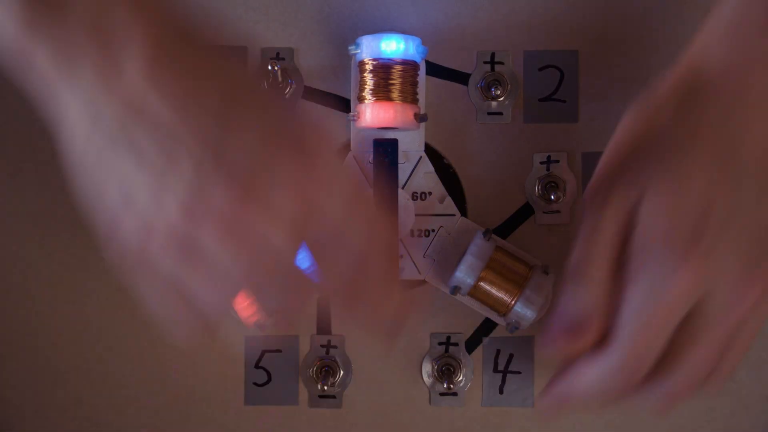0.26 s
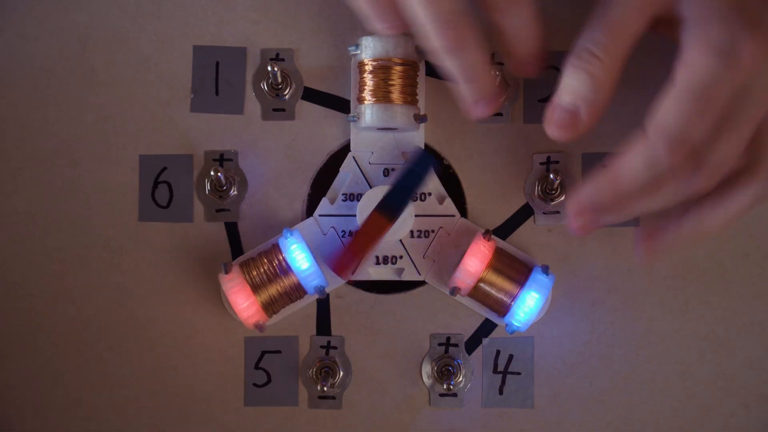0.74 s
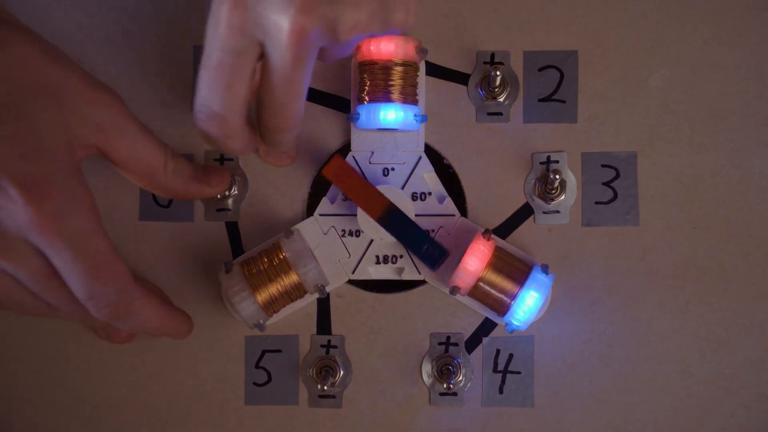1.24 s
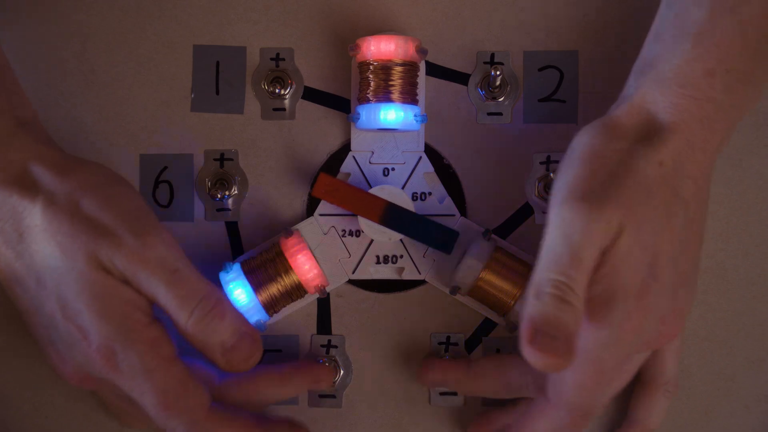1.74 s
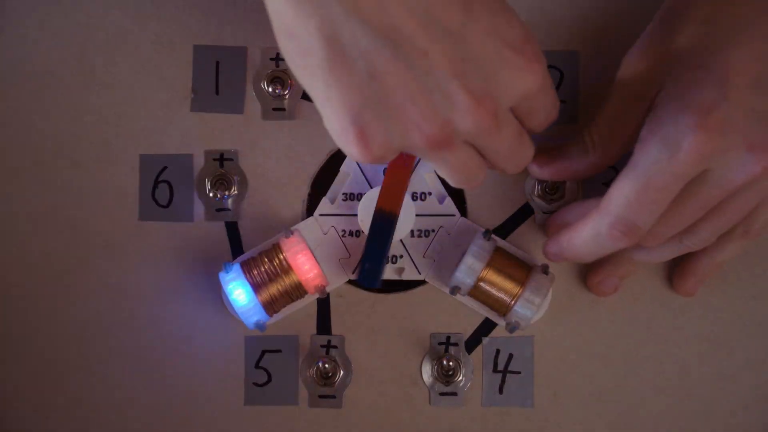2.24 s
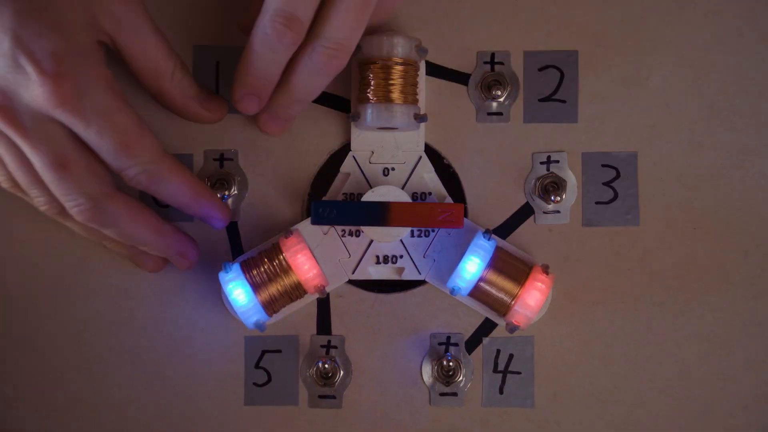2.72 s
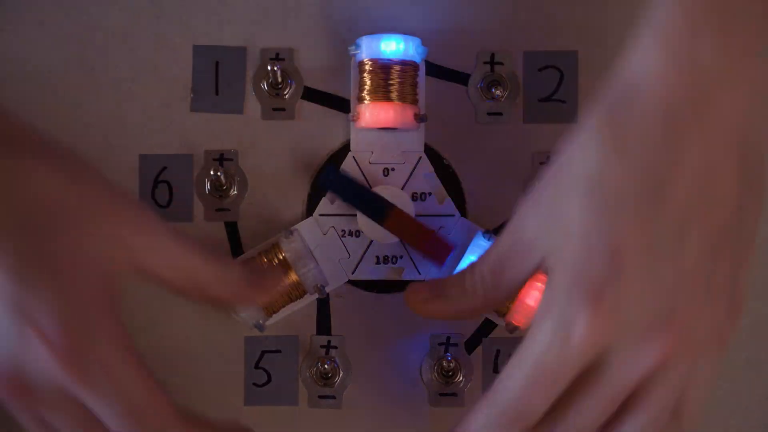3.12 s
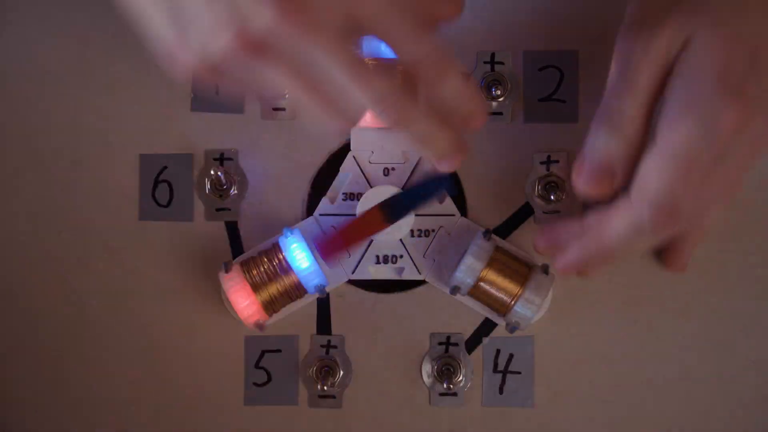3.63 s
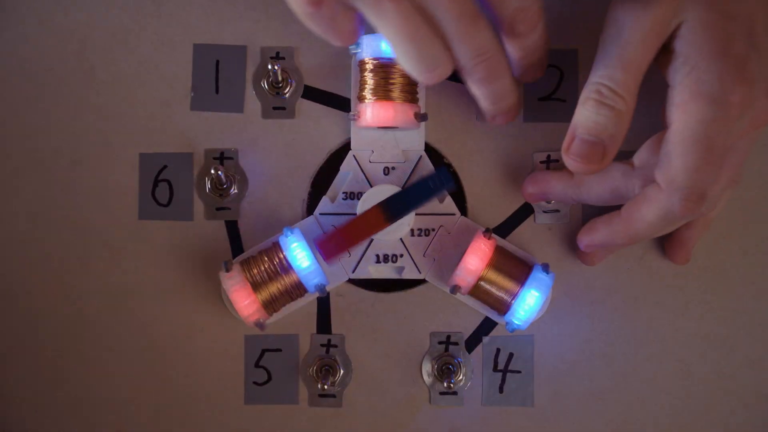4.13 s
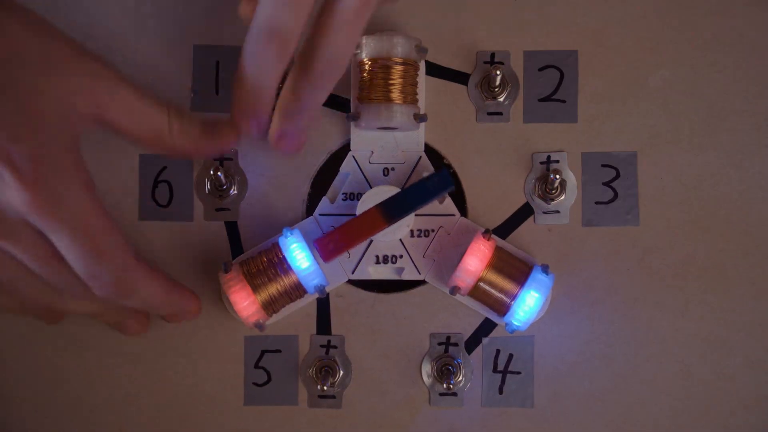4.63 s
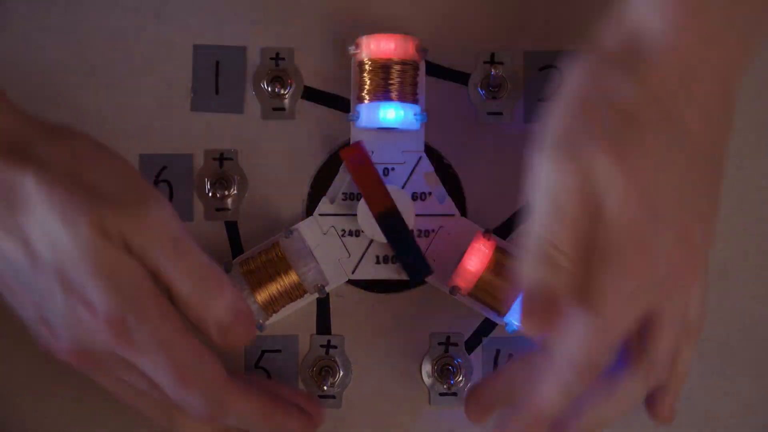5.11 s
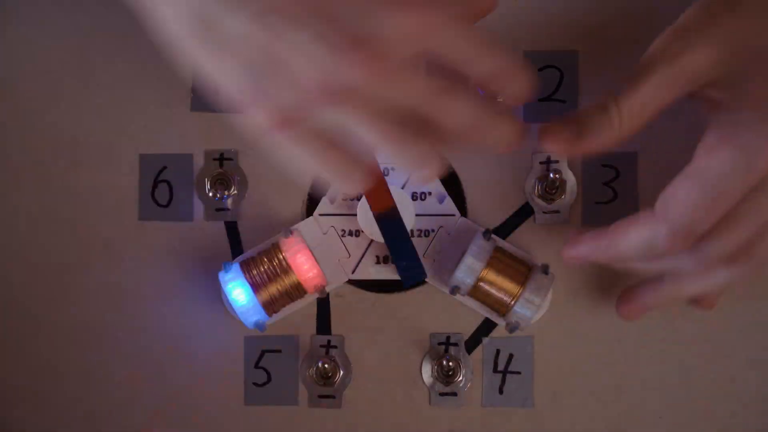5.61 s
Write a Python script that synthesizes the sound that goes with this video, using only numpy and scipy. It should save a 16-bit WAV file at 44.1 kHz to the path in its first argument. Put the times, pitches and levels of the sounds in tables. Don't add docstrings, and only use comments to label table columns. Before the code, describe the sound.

Close, dry metallic clacks come in eleven quick groups over six seconds, mostly doubles and triples, with occasional single snaps. The levers ring briefly, contacts chatter, and the board beneath gives a hollow tick. Soft finger movement, tiny taps and low table thumps from leaning arms fill the gaps. A small, lightly reverberant room hums quietly; a distant bird chirps faintly in the second half.

```python
import sys
import numpy as np
from scipy import signal
from scipy.fft import rfft, irfft
from scipy.io import wavfile
from scipy.ndimage import uniform_filter1d

SR = 44100
rng = np.random.default_rng(int(sys.argv[2]) if len(sys.argv) > 2 else 0)


def digitize_waveform(pressure):
    field = np.atleast_2d(pressure).T
    bounded = np.clip(field, -1, 1)
    quanta = np.round(bounded * 32767).astype(np.int16)
    wavfile.write(sys.argv[1], SR, quanta)


def undo_db(level):
    steps = np.asarray(level, float) / 20
    return 10 ** steps


N = 258426

# f/Hz, level/dB
SKIN_SPECTRUM = [(300, -9.5), (1000, 2.5), (3000, 4), (6000, 2), (10000, -4.5), (15000, -12)]


def read(points, hz):
    f, value = np.transpose(points)
    return np.interp(np.log(hz + 1), np.log(f + 1), value)


def peaked(x):
    return x / (abs(x).max() + 1e-12)


def evened(x):
    return x / np.sqrt(np.mean(x ** 2) + 1e-20)


def coloured(x, points):
    gain = undo_db(read(points, np.fft.rfftfreq(len(x), 1 / SR)))
    return irfft(rfft(x) * gain, len(x))


def add(mix, s, sound):
    part = mix[max(round(s * SR), 0):][:len(sound)]
    part += sound[:len(part)]


def swells(rows, rest_db):
    t = np.arange(N) / SR
    bells = [undo_db(db) * np.exp(-(2 * (t - s) / length_s) ** 2) for s, db, length_s in rows]
    return undo_db(rest_db) + sum(bells)


def flicks():
    # t/s, peak level/dB, metal f/Hz, board level/dB re peak, thud level/dB re peak
    leads = [(0.1700, -9.5, 5650, -22, -8), (0.7299, -0.5, 6220, -12.5, -16.5),
             (1.3259, -0.5, 6260, -16.5, -20.5), (1.8464, -5, 6220, -11, -17.5),
             (2.4019, -0.5, 7400, -17.5, -21.5), (2.9367, -2.5, 7480, -9.5, -37.5),
             (3.445, -6.5, 5440, -19, -12.5), (3.9433, -4, 5710, -7, -18.5),
             (4.33, -0.5, 5930, -11.5, -24.5), (4.9294, 1, 7790, -13, -19.5),
             (5.4374, -3.5, 5760, -15, -34)]
    followers = [(0.181, -1.5, 6780, -20, -19), (0.2069, -4.5, 7370, -10.5, -16.5),
                 (0.7467, -2.5, 5600, -13.5, -30.5), (1.3435, -3.5, 4640, -12.5, -31.5),
                 (1.8558, -7, 5530, -9.5, -29), (1.8787, 4, 5560, -10, -33.5), (2.43, -1.5, 5920, -21, -20),
                 (2.941, -1.5, 5170, -15, -17), (2.9482, -13.5, 6470, -9.5, -11.5),
                 (3.4552, -1, 6630, -28, -18), (3.4693, -6, 6520, -10, -18.5), (3.9465, -9, 5940, -22, -18),
                 (4.9466, -4.5, 4884, -22.5, -26), (5.4426, -4, 5130, -15, -15.5),
                 (5.465, 3, 5160, -10.5, -24)]
    flick_sides = [0, 1, 2, 0, 1, 2, 0, 1, 1, 2, 0]
    near, sent = np.zeros((2, N))
    levers = [(*row, -14.5) for row in leads] + [(*row, -17.5) for row in followers]
    lead_s = np.transpose(leads)[0]
    for s, *row in sorted(levers):
        flick = np.searchsorted(lead_s, s, "right") - 1
        direct, spread = snap(*row, flick_sides[flick])
        add(near, s - 0.02, direct)
        add(sent, s - 0.02, spread)
    return near, sent


def snap(db, metal_hz, board_db, thud_db, edge_db, side):
    # f ratio, level/dB, t60/s
    metal_modes = [(.5, -12.5, .004), (.66, -1, 0.0064), (.82, -2.5, .005), (1.0, 7, .008),
                   (1.16, -1.5, .005), (1.4, -5.5, 0.0049), (1.7, -11, 0.0024), (2.1, -14.5, .003)]
    # f/Hz, level/dB, t60/s
    board_modes = [(930, -9, 0.017), (1100, -10, 0.041), (1370, -5, 0.091), (1605, 4, 0.061),
                   (1710, 6, 0.027), (2170, -1, 0.036), (2700, -10.5, 0.0027), (3280, -13.5, 0.034)]
    # f/Hz, t60/s, level/dB driven from near edge, right edge, left edge
    panel_modes = [(221, 0.056, -6, -8, -14.5), (316, 0.036, -5.5, -13.5, -17.5),
                   (397, .07, -2, -11.5, -16.5), (425.3, 0.11, -13.5, -1, -7.5), (620, .08, 2.5, -5, 4.5),
                   (712, 0.097, -2, -1.5, 0.5), (907, .07, -7.5, 3, -9.5), (1023, 0.086, -13, 3.5, -9)]
    # f/Hz, level/dB
    crack_spectrum = [(180, -44), (500, -20), (1500, 1.5), (3000, -2.5), (6000, -3), (9000, -3),
                      (12000, -11.5), (15000, -38)]
    # f/Hz, level/dB
    spread_spectrum = [(120, -32.5), (250, -13), (600, -4.5), (1500, -2), (2700, -3), (5500, -5),
                       (8000, -8.5), (11000, -16), (15000, -29.5), (15600, -50.5)]
    side_edge_db = [-1, 1.5, -0.5]

    t, lead_s = np.arange(4096) / SR, 0.02
    edge_db = edge_db + side_edge_db[side]
    luck = rng.standard_normal((2, 8))
    chance = rng.random(4096)
    noise = rng.standard_normal((2, 4096))

    after = t - lead_s
    rattle_ms = 1.63 + 0.027 * max(db, 0)
    u = np.maximum(after, 0) * 1000 / rattle_ms
    release = 0.13 * np.exp(-abs(after) / 0.0015) * (after > -0.0022)
    rattle = u ** 0.84 * np.exp(1 - u)
    settling = 0.25 * (after > 0) * np.exp(-after / 0.016)
    chatter = release + rattle + settling
    blows = chatter * noise[0] * (chance < 0.25)

    def heard(response):
        return peaked(signal.fftconvolve(blows, response)[:4096])

    edge = [(250, -22), (650, -1.0), (6000, 0.0034), (10000, 0.72 * (edge_db + 14))]
    crack = coloured(peaked(coloured(chatter * noise[1], crack_spectrum)), edge)
    metal = heard(coloured(ring(metal_modes, t, luck, scale_hz=metal_hz), edge))
    board = heard(ring(board_modes, t, luck[:, ::-1]))
    driven = [(hz, sides[side], t60) for hz, t60, *sides in panel_modes]
    thud = heard(ring(driven, t, -0.2 * luck) * (1 - np.exp(-t / 0.004)))
    direct = peaked(metal + 1.1 * crack)
    direct = direct + undo_db(board_db + 2.5) * board + undo_db(thud_db + 1.5) * thud

    pulse = coloured(np.arange(4096) == round(lead_s * SR), spread_spectrum)
    tilt = [(500, 0.3 * (thud_db + 25.0)), (1600, 0.82 * (board_db + 15.5)), (4000, 0.0052),
            (6000, 0.0021), (10000, 1.1 * (edge_db + 13.5))]
    even = np.linalg.norm(direct) * coloured(pulse / np.linalg.norm(pulse), tilt)
    spread = 0.1 * direct + 0.41 * undo_db(thud_db) * thud + 0.74 * even
    return undo_db(min(db, 0)) * np.array([direct, spread])


def ring(modes, t, detune, scale_hz=1):
    hz, db, t60_s = np.transpose(modes)[:, :, None]
    luck = detune[:, :len(modes), None]
    hz = np.minimum(hz * scale_hz * (1 + 0.041 * luck[0]), 15500)
    decay = undo_db(db + 1.7 * luck[1] - 60 * t / t60_s)
    return (decay * np.sin(2 * np.pi * hz * t)).sum(0)


def fingers():
    # t/s, trip t/s, level/dB
    pushes = [(0.155, .169, -55), (0.718, 0.732, -47), (1.309, 1.321, -47.5), (1.831, 1.856, -55.5),
              (2.388, 2.402, -52), (2.922, 2.939, -54), (3.426, 3.445, -48), (3.929, 3.947, -48.5),
              (4.317, 4.329, -42), (4.917, 4.925, -45.5), (5.43, 5.447, -57.5)]
    # t/s, peak level/dB, brightest f/Hz
    brushes = [(0.1144, -52, 9000), (0.499, -52.5, 6000), (0.5478, -42.5, 6170), (1.1776, -52, 4740),
               (1.4346, -42, 5800), (1.6496, -53.5, 2840), (1.97, -50, 2270), (1.9972, -44, 5830),
               (2.7894, -52, 3780), (3.5774, -44, 6100), (4.8665, -47.5, 3850), (5.0294, -40.5, 3010),
               (5.576, -35.5, 5040), (5.5876, -55.5, 7500), (5.8444, -63, 5420)]
    # t/s, peak level/dB, knock level/dB re peak, brightest f/Hz
    landings = [(0.0204, -46.5, 8.5, 5900), (0.0494, -55.5, 5.5, 3280), (2.16, -51.5, 17.5, 5020),
                (2.1675, -45, 8.5, 1970), (2.5894, -50.5, 14, 2170), (2.6271, -55, 20, 3660),
                (2.7544, -51, 8, 3130), (2.9073, -53.5, 5, 5480), (3.0484, -37, 5, 5480),
                (3.7798, -51.5, 9, 5500), (5.8094, -59, -4.5, 6220)]
    # t/s, peak level/dB, brightest f/Hz
    nails = [
        (0.668, -55.5, 7990),
        (1.2635, -43.5, 4500),
        (3.855, -42, 5520),
        (4.7745, -46, 4740),
    ]
    # t/s, peak level/dB, brightest f/Hz
    rubs = [
        (1.695, -49.5, 6020),
        (1.7392, -52, 7400),
        (2.245, -54.5, 6040),
        (5.293, -54.5, 6000),
        (5.31, -44.5, 6150),
        (5.76, -54, 6100),
    ]
    mix = np.zeros(N)
    for rows, length_ms in (brushes, 23), (nails, 4.4), (rubs, 35):
        for s, db, hz in rows:
            add(mix, s, touch(db, -11, length_ms, hz))
    for s, db, knock_db, hz in landings:
        add(mix, s, touch(db, knock_db, 7.8, hz))
    for s, trip_s, db in pushes:
        add(mix, s, push(trip_s - s, db))
    return mix


def touch(db, knock_db, length_ms, bright_hz):
    # f/Hz, level/dB
    knuckle = [(90, -18.5), (200, -1), (380, 4.5), (600, -9), (1000, -18.5), (2000, -41)]
    t = np.arange(4096) / SR
    grain = rng.standard_normal(4096) * undo_db(2.2 * np.minimum(rng.exponential(1, 4096), 4))
    colour = [(0.2 * bright_hz, -18), (0.6 * bright_hz, -6), (bright_hz, 0),
              (1.5 * bright_hz, -6), (2.5 * bright_hz, -15), (40000, -35)]
    slip = coloured(grain, colour) * (1 - np.exp(-t / 0.00076))
    slip = slip * np.exp(-t * 1000 / np.clip(length_ms, 1, 40))
    knock = coloured(rng.standard_normal(4096), knuckle)
    knock = knock * (1 - np.exp(-t / 0.001)) * np.exp(-t / 0.02)
    return undo_db(db) * (peaked(slip) + undo_db(knock_db - 1.5) * peaked(knock))


def push(length_s, db):
    creak = coloured(rng.standard_normal(2048), SKIN_SPECTRUM)[:round(length_s * SR)]
    return undo_db(db) * evened(creak) * np.linspace(1, 0.8, len(creak))


def hands():
    # t/s, level/dB
    busy = [(0.05, -53.5), (0.171, -67.5), (0.54, -49.5), (0.68, -54), (0.94, -52.5), (1.24, -56),
            (1.5, -67), (1.75, -57.5), (2.0, -63), (2.19, -54), (2.5, -51.5), (2.9, -61), (3.3, -61),
            (3.92, -52), (4.2, -63.5), (4.44, -49.5), (4.75, -67.5), (5.4, -63)]
    # f/Hz, level/dB
    shuffle_spectrum = [(60, -14), (120, -5), (250, -5.5), (450, 0.0), (800, -8), (1500, -17), (3000, -38)]
    # t/s, level/dB, length/s
    leans = [(0.06, -48, .12), (0.27, -61, 0.076), (0.55, -65, 0.064), (1.75, -63, 0.16),
             (2.19, -61, 0.076), (2.58, -56, .35), (2.84, -59, 0.059), (3.44, -53, .12), (3.9, -63.5, .15),
             (4.55, -57.5, 0.11), (5.35, -58, .14), (5.52, -52.5, .1)]
    # t/s, level/dB, length/s
    sweeps = [
        (0.54, -63.5, .12),
        (1.75, -71, .1),
    ]

    busy_db = np.interp(np.arange(N) / SR, *np.transpose(busy))
    shuffle = undo_db(busy_db - 6.5) * evened(coloured(rng.standard_normal(N), shuffle_spectrum))

    table_spectrum = [(45, -28.0), (62, -2.5), (75, 2.0), (88, -3.0), (115, -45.0)]
    rumble = evened(coloured(rng.standard_normal(N), table_spectrum))
    wander = evened(uniform_filter1d(uniform_filter1d(rng.standard_normal(N), 3000), 3000))
    table_hz = 74 * (1 + 0.036 * wander)
    table = np.sqrt(2) * np.sin(2 * np.pi * np.cumsum(table_hz) / SR)
    shaking = undo_db(-69.5) * rumble + swells(leans, -91.5) * (table + 0.3 * rumble)

    grain = rng.standard_normal(N) * undo_db(2.5 * np.minimum(rng.exponential(1, N), 5))
    rustle = evened(coloured(grain, SKIN_SPECTRUM))
    sleeves = swells(sweeps, -71.5) * undo_db(0.2 * (busy_db - busy_db.mean())) * rustle
    return shuffle + shaking + sleeves


def room(x):
    # f/Hz, t60/s
    decay = [(150, 0.36), (500, 0.35), (1500, 0.36), (4000, 0.31), (8000, 0.3), (14000, 0.29)]
    at = np.arange(180, SR // 2 - 10, 10) + rng.integers(0, 10, (3, (SR // 2 - 181) // 10))
    bounce = rng.choice([-1., 1.], at.shape) * undo_db(2.5 * rng.standard_normal(at.shape))
    taps = np.zeros((3, SR // 2))
    np.put_along_axis(taps, at, bounce, 1)
    hz, t, z = signal.stft(taps, SR, nperseg=128)
    fade = undo_db(-60 * t / read(decay, hz)[:, None]) * (1 + 0.6 * np.exp(-t / 0.015))
    tails = signal.istft(z * fade, SR, nperseg=128)[1]
    phase = np.arange(N) / SR * 1.3 + np.arange(3)[:, None] / 3
    turns = np.sqrt(2 / 3) * np.cos(np.pi * phase)
    return signal.fftconvolve(x * turns, tails / np.linalg.norm(tails[0]), axes=1).sum(0)[:N]


def bird():
    # t/s, length/s, start f/Hz, end f/Hz, level/dB
    twitter = [(3.148, 0.069, 5580, 5370, -66.5), (3.173, 0.027, 5050, 4930, -70.5),
               (3.22, 0.055, 5250, 5150, -74.5), (3.295, .09, 4870, 4650, -70),
               (3.375, .065, 5660, 5540, -62), (3.596, 0.081, 5450, 5340, -69.5),
               (3.717, .07, 4630, 4850, -70), (3.783, 0.11, 5600, 5440, -62.5),
               (4.144, .07, 4524, 4550, -69), (4.235, 0.082, 5400, 5160, -64.5),
               (4.46, 0.097, 5050, 5050, -65)]
    far = np.zeros(N)
    for s, *row in twitter:
        add(far, s, chirp(*row))
    return far


def chirp(length_s, start_hz, end_hz, db):
    t = np.arange(0, length_s, 1 / SR)
    flutter = uniform_filter1d(rng.standard_normal((8192, 2)), 120, 0)[:len(t)] @ [1, 1j]
    turn = np.exp(2j * np.pi * np.cumsum(np.linspace(start_hz, end_hz, len(t))) / SR)
    return undo_db(db) * evened((flutter * turn).real) * signal.windows.tukey(len(t), 0.6)


def standing():
    # f/Hz, width/Hz, level/dB
    resonances = [(172, 67, -62), (265.6, 79, -58)]
    hz = np.fft.rfftfreq(N, 1 / SR)
    mix = np.zeros(N)
    for f_hz, width_hz, db in resonances:
        z = rfft(rng.standard_normal(N)) / (1 + (2 * (hz - f_hz) / width_hz) ** 2)
        mix += undo_db(db) * evened(irfft(z, N))
    return mix


def hum():
    # f/Hz, density level/dB per Hz
    hum_spectrum = [(12, -47.5), (20, -13), (65, -4), (110, -12.5), (150, -3), (210, -3.5), (270, 2),
                    (485, -14), (718, -11), (1570, -21), (1860, -25), (5380, -35), (9950, -32.5),
                    (13900, -40), (16000, -56)]
    frames, hz = N // 256 + 5, np.fft.rfftfreq(1024, 1 / SR)
    a, b, patches = rng.standard_normal((frames, 513, 3)).T
    patches = evened(uniform_filter1d(uniform_filter1d(patches, 8, 0), 12, 1))
    z = (a + 1j * b) * undo_db(read(hum_spectrum, hz)[:, None] + 0.43 * patches)
    return undo_db(-58) * evened(signal.istft(z, nperseg=1024, noverlap=768)[1][:N])


def scene():
    near, sent = flicks()
    skin = fingers()
    far = bird()
    board = near + skin + undo_db(-9.0) * room(sent + skin + 1.3 * far)
    board = signal.sosfilt(signal.butter(4, 185, "high", fs=SR, output="sos"), board)
    return (board + far + hum() + standing() + hands())[None]


def top_cut(x):
    return signal.sosfilt(signal.butter(12, 16310, fs=SR, output="sos"), x)


def record(dry):
    edge = signal.firwin(127, 15300, window=("kaiser", 6), fs=SR)
    return top_cut(signal.oaconvolve(dry, edge[None], "same"))


dry = scene()
out = record(dry)
digitize_waveform(out)
```